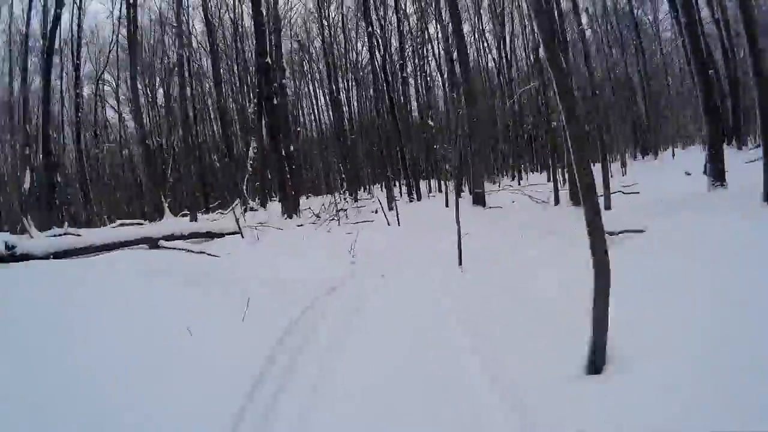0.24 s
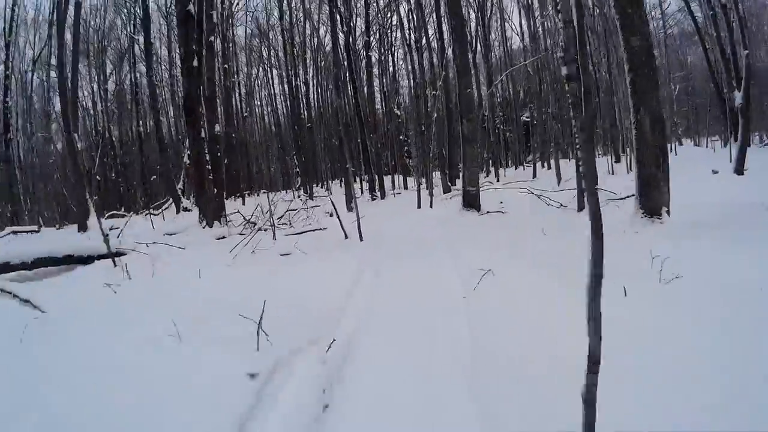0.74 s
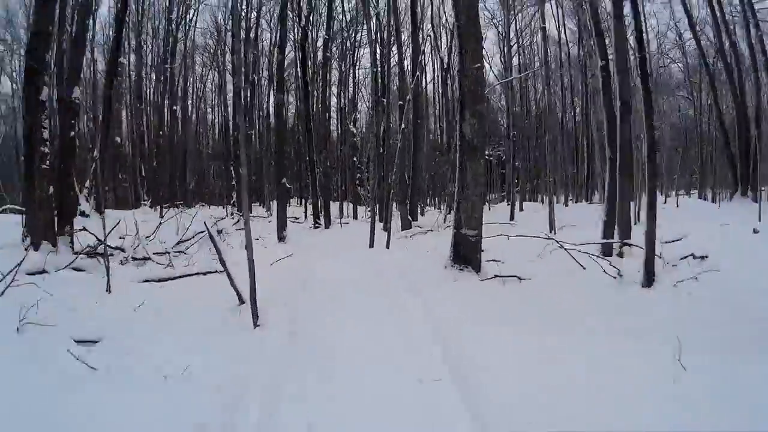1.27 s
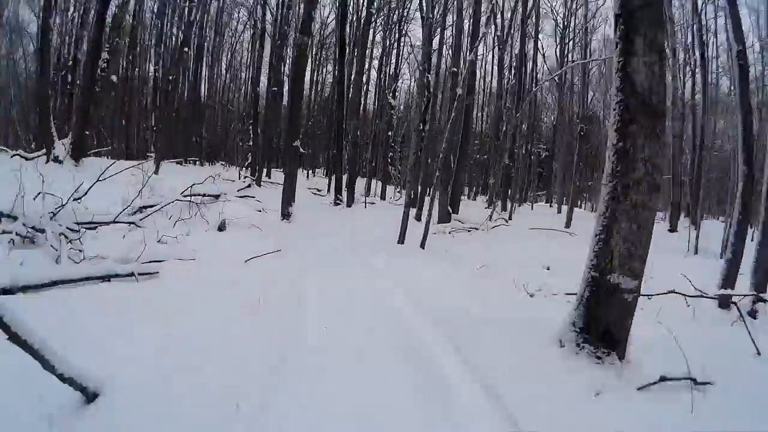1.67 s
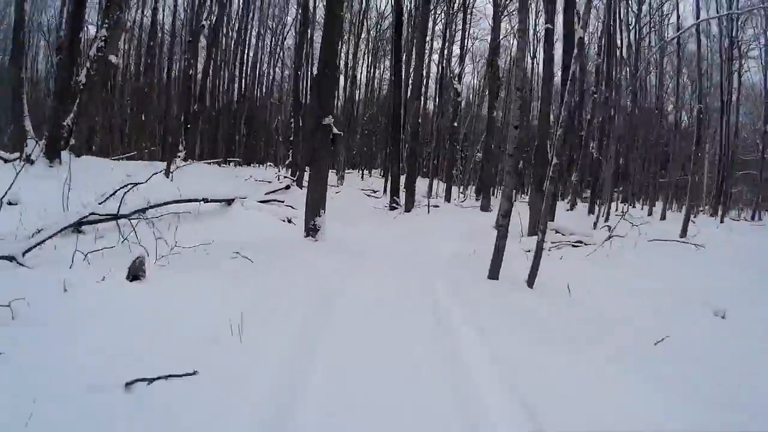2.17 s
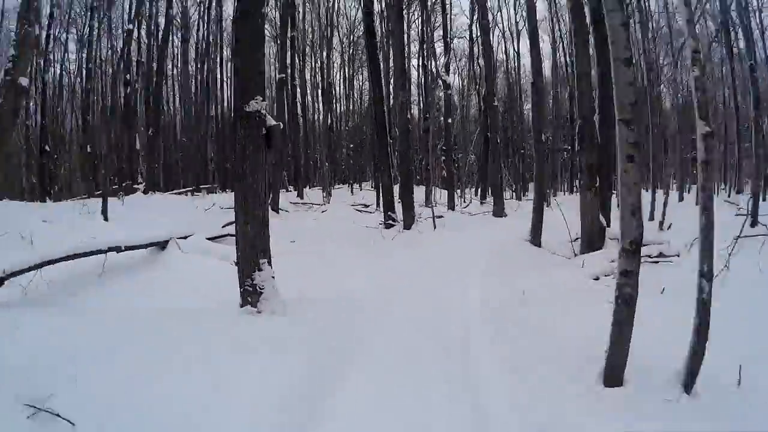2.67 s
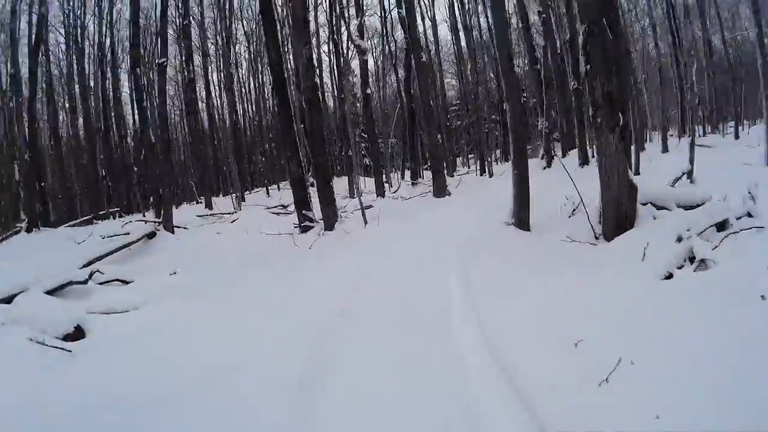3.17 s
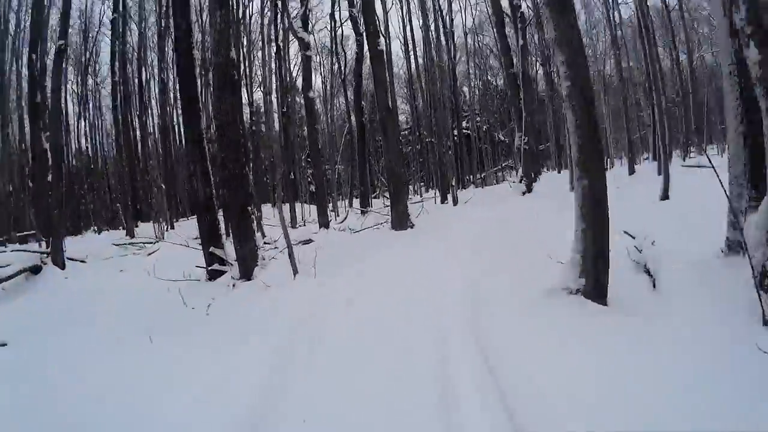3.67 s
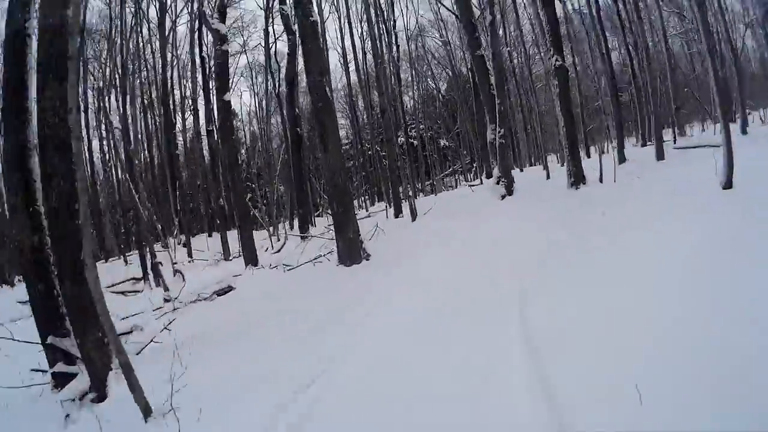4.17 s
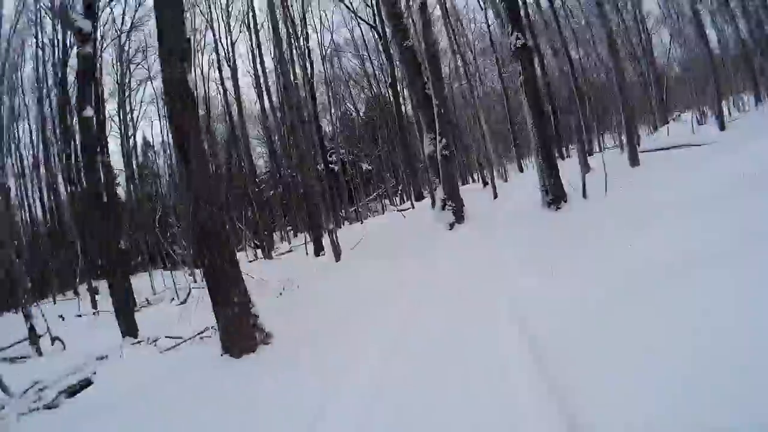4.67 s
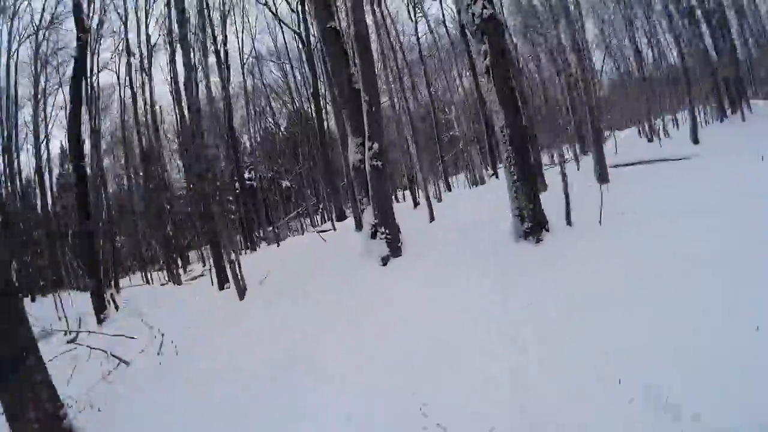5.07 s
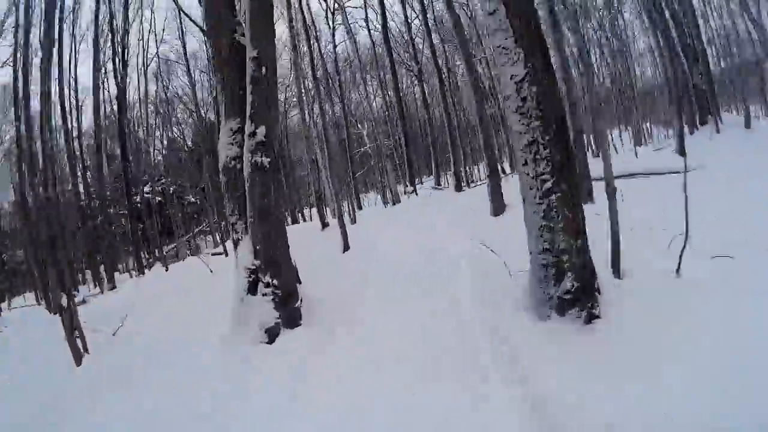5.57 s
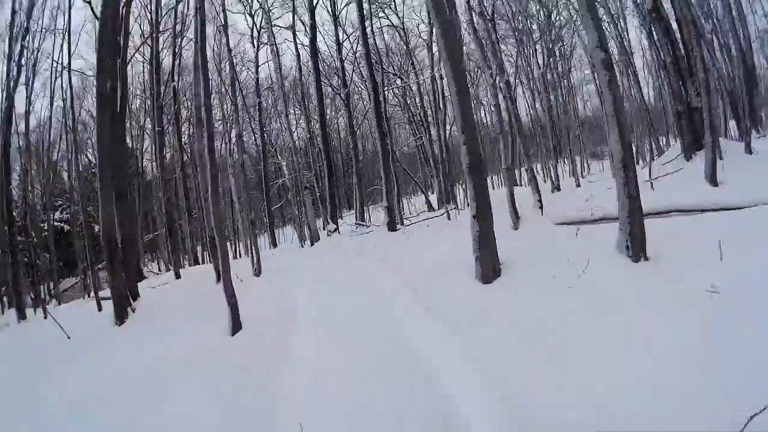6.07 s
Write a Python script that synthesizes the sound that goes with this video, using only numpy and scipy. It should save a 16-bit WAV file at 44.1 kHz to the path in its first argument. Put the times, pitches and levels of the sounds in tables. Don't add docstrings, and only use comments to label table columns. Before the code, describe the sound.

Very close, boxy frame-mounted sound of a bike on snow: constant deep rumble with uneven bumps and faint hiss. Loose plastic ticks in runs during the first two seconds. A rough half-second brake judder bursts out, far louder than the rolling, then drops to quiet pad taps. From about four and a half seconds a bright snap leads into scattered cracking knocks, soft chain slaps and light metallic rattles until the end.

```python
import sys
import numpy as np
from scipy import signal
from scipy.io import wavfile
from scipy.ndimage import uniform_filter1d

SR = 44100
rng = np.random.default_rng(int(sys.argv[2]) if len(sys.argv) > 2 else 0)


def file_out(sig):
    cols = np.atleast_2d(sig).T
    lim = np.clip(cols, -1, 1)
    pcm = np.round(lim * 32767).astype(np.int16)
    wavfile.write(sys.argv[1], SR, pcm)


def field_ratio(decibels):
    return 10 ** (np.asarray(decibels, dtype=float) / 20)


N = 278712
BITE_S, LET_GO_S, FREE_S = 1.829, 2.372, 4.47

# [t/s, level/dB]
PAD_GRABS = [(1.8297, -19), (1.836, -15), (1.8399, -12), (1.8566, -13), (1.8694, -15), (1.8765, -13),
             (1.8853, -11), (1.9034, -8.5), (1.917, -14), (1.9324, -13), (1.939, -7), (1.964, -11),
             (1.9686, -12), (1.9939, -7.5), (2.0005, -13), (2.01, -13), (2.03, -20), (2.046, -14.5),
             (2.064, -11), (2.077, -14), (2.0943, -11.5), (2.1043, -14), (2.123, -16), (2.1362, -15),
             (2.143, -19), (2.159, -22), (2.175, -18), (2.195, -14), (2.2204, -17), (2.2348, -17.5),
             (2.2534, -20.5), (2.2764, -19), (2.294, -14.5), (2.3084, -28), (2.3247, -18.5), (2.3454, -25),
             (2.3654, -28)]
# [t/s, housing ring level/dB, crack level/dB]
PAD_TAPS = [(2.690, -25.5, -58), (2.7561, -26, -54), (2.8051, -28, -66), (2.838, -30, -64),
            (2.853, -26.5, -42.5), (2.885, -23.5, -72), (2.9142, -26, -70), (2.9527, -27, -70),
            (2.974, -22.5, -63), (2.9833, -36, -58), (3.0107, -25.5, -57), (3.0458, -25.5, -59),
            (3.084, -30.5, -63), (3.1551, -22, -50), (3.191, -18.5, -41.6), (3.21, -25, -62),
            (3.2286, -19, -41.5), (3.243, -27, -61), (3.2654, -30, -62), (3.6871, -38, -40.5),
            (3.716, -29.5, -48), (3.742, -45, -42), (3.934, -24.5, -68), (3.9854, -33, -55.1),
            (4.064, -27.5, -67.1), (4.1509, -31, -62), (4.17, -29, -55), (4.1964, -34, -49),
            (4.222, -31, -52), (4.2516, -27.5, -48), (4.2835, -28.5, -57), (4.3857, -48, -38.5),
            (4.4485, -34, -47)]
# [t/s, level/dB]
CHAIN_SLAPS = [(4.647, -26.5), (4.716, -27), (4.817, -26.5), (4.851, -35), (4.884, -30.5), (4.916, -32),
               (5.055, -33), (5.0795, -26.5), (5.289, -31), (5.325, -30), (5.481, -27), (5.568, -26.5),
               (5.6, -26), (5.627, -25), (5.7438, -28), (5.8257, -26), (6.0317, -33), (6.087, -27),
               (6.1145, -35), (6.2326, -22.5), (6.264, -23)]
# [t/s, level/dB]
CABLE_SNAPS = [
    (4.535, -41),
    (4.540, -11),
    (4.551, -25),
    (5.68, -42),
]
# [f/Hz, width/Hz, level/dB]
HOUSING_MODES = [(1150, 63, 3.5), (1274, 74, 1), (1500, 218, 3.5), (1763, 99, -0.5), (1962, 120, -5),
                 (2050, 130, -28)]
# [f/Hz, level/dB, t60/s]
CRACK_MODES = [(2155, -0.5, 0.05), (2950, -7, 0.03), (3600, -11, 0.018), (4350, 3, 0.022),
               (5180, -11.5, 0.045), (5830, -26, .03)]


def rms_one(x):
    return x / np.sqrt(np.mean(x ** 2) + 1e-20)


def in_time(rows):
    s, *columns = np.transpose(rows)
    return [np.interp(np.arange(N) / SR, s, c) for c in columns]


def drift(rate):
    r = np.exp(-80 * np.pi * rate / SR)
    noise = rng.standard_normal(N // 40 + 2002)
    slow = signal.lfilter([1], [1, -2 * r, r * r], noise)[2000:]
    return np.interp(np.arange(N) / 40, np.arange(len(slow)), rms_one(slow))


def resonance(x, hz, width):
    r = np.exp(-np.pi * width / SR)
    poles = [1, -2 * r * np.cos(2 * np.pi * hz / SR), r * r]
    return signal.lfilter([(1 - r * r) / 2, 0, (r * r - 1) / 2], poles, x)


def cut(x, hz, kind, order):
    return signal.sosfilt(signal.butter(order, hz, kind, fs=SR, output="sos"), x)


def swells(rows, rest_db, ease_s):
    level = np.full(N, field_ratio(rest_db))
    for at, length, db in rows:
        level[int(at * SR):int((at + length) * SR)] = field_ratio(db)
    r = np.exp(-1 / (ease_s * SR))
    return 20 * np.log10(signal.filtfilt([1 - r], [1, -r], level) + 1e-9)


def fading(times, levels_db, t60):
    marks = np.full(N, 1e-18)
    marks[np.round(np.asarray(times) * SR).astype(int)] = field_ratio(np.asarray(levels_db))
    return signal.lfilter([1], [1, -field_ratio(-60 / (t60 * SR))], marks)


def bursts(times, levels_db, t60):
    signs = 1 - 2 * rng.integers(2, size=N, dtype=np.int8)
    return fading(times, levels_db, t60) * signs


def impulses(times, levels_db):
    blows = np.full(N, 1e-18)
    blows[(times * SR).astype(int)] = field_ratio(levels_db) * rng.choice([-1, 1], len(times))
    return blows


def shaken(modes, force, patchy_db, rate):
    out, plain = 0, 0
    for hz, width, db in modes:
        gain = np.repeat(field_ratio(db + patchy_db * drift(rate)[::8]), 8)[:N]
        once = resonance(force * rng.standard_normal(N), hz, 1.506 * width)
        out = out + gain * resonance(once, hz, 1.34 * width)
        plain = plain + field_ratio(2 * db) * width
    return out / np.sqrt(plain * 2.4 / SR)


def rolling(tyre_db, rub_db):
    # [start t/s, length/s, level/dB]
    bumps = [(0, 0.19, -20), (.22, 0.053, -19), (.34, 0.18, -18), (.5, 0.13, -22.5), (.83, 0.068, -19),
             (.95, 0.041, -25), (1.09, 0.11, -23.5), (1.235, 0.23, -21.5), (1.51, 0.02, -20),
             (1.685, 0.08, -20), (1.8, 0.091, -20), (1.92, 0.23, -14.5), (2.15, 0.096, -18.5),
             (2.3, 0.083, -23), (2.48, 0.14, -22), (2.72, 0.14, -26.5), (2.97, 0.058, -19.5),
             (3.13, 0.12, -25), (3.235, 0.075, -24), (3.53, 0.12, -22), (3.825, 0.037, -21.5),
             (3.9, 0.077, -22), (4.065, 0.054, -25.5), (4.16, 0.168, -27), (4.36, 0.11, -22.5),
             (4.68, 0.04, -21.5), (4.875, 0.092, -24.5), (5.005, 0.24, -24.5), (5.3, 0.087, -26.5),
             (5.45, 0.08, -25), (5.61, 0.13, -23), (5.78, .04, -21.5), (5.838, 0.069, -21),
             (5.93, 0.099, -24.5), (6.22, 0.054, -22)]
    swing_db = swells(bumps, rest_db=-29.5, ease_s=0.0034)
    grab = slips(depth_db=11.0, spread=0.33)
    judder = field_ratio(1.99 * drift(60))
    roll_db = np.minimum(rub_db, -46.5)
    brake = np.sqrt(field_ratio(rub_db) ** 2 - field_ratio(roll_db) ** 2 + 1e-12)
    roll = shaken(HOUSING_MODES, field_ratio(roll_db - 1.1) * judder ** 1.59, patchy_db=2.0, rate=4.0)
    rubbing = brake_drag(brake, grab) + pads_and_loose_parts(field_ratio(pad_hiss(rub_db)) * judder, grab)
    return tyres(tyre_db, swing_db) + roll + rubbing + hum(swing_db, even=0.76) + heave()


def tyres(tyre_db, swing_db):
    # [f/Hz, width/Hz, level/dB]
    frame_modes = [(155.2, 67, -7), (205, 39.4, 0), (247.7, 37.6, -6), (412, 10, -38), (465.3, 53.3, -1),
                   (660, 100, -19), (764.5, 64, -16), (842, 68, -19.5)]
    # [start t/s, length/s, lift/dB]
    crusts = [
        (.68, 0.091, 6.5),
        (1.19, 0.097, 4),
        (6.15, 0.091, 4.5),
    ]
    crunch_db = swells(crusts, rest_db=-0.4, ease_s=0.0071)
    force = field_ratio(tyre_db + crunch_db + 0.1 * (swing_db + 24.5))
    return shaken(frame_modes, force, patchy_db=-0.73, rate=84)


def hum(level_db, even):
    # [f/Hz, width/Hz, level/dB]
    mount_mode = (126.5, 10.55, 0)
    hz, width, db = mount_mode
    once = resonance(rng.standard_normal(N), hz, width)
    sway = rms_one(resonance(once, hz, 2.3 * width))[::-1]
    swell = np.sqrt(uniform_filter1d(sway ** 2, size=800) + 0.08)
    return field_ratio(level_db + db) * rms_one(sway / swell ** np.clip(even, 0, 1))


def heave():
    # [start t/s, length/s, level/dB]
    hollows = [
        (0, 0.49, -37),
        (.88, .15, -38),
        (3.18, 0.1, -44.5),
        (3.65, 0.25, -33),
        (4.17, 0.14, -37),
        (4.55, 0.91, -38),
        (5.3, 0.88, -36.5),
    ]
    low = cut(cut(rng.standard_normal(N), 69, "high", order=2), 105, "low", order=4)
    return field_ratio(swells(hollows, rest_db=-44, ease_s=0.032) + 3.5) * rms_one(low)


def slips(depth_db, spread):
    slips_per_s = 68
    at = np.cumsum(np.exp(spread * rng.standard_normal(700)) / slips_per_s)
    t = np.arange(N) / SR
    last = np.searchsorted(at, t)
    age = (t - np.append(0, at)[last]) * slips_per_s
    return rms_one(field_ratio(2.5 * rng.standard_normal(701)[last] - depth_db * age))


def brake_drag(brake, grab):
    # [f/Hz, width/Hz, level/dB]
    drag_modes = [(297, 47, -12), (452, 70, -1.5), (673.5, 30, -5), (741, 110, -7.5), (924, 94, -12.5),
                  (1166, 62, -6.5), (1308, 212, -9), (1482, 75, -1.5), (1668, 130, -15.5), (1830, 56, -11)]
    t = np.arange(N) / SR
    grab_s, grab_db = np.transpose(PAD_GRABS)
    onset = np.clip((t - BITE_S) / 0.0033, .12, 1)
    between_grabs = np.where((t > BITE_S) & (t < LET_GO_S), field_ratio(-5.5), 1)
    force = brake * onset * field_ratio(6.5) * grab ** .55 * between_grabs
    force = force + fading(grab_s, grab_db - 8.5, t60=0.042)
    return cut(shaken(drag_modes, force, patchy_db=-0.9, rate=32), 2300, "low", order=4)


def pad_hiss(rub_db):
    t = np.arange(N) / SR
    rubbing = -65.5 + 0.4 * (rub_db + 41)
    free = -71 + 0.46 * np.minimum(rub_db + 47.5, 3.0)
    clear = np.where(t > LET_GO_S, np.clip(1 - (t - LET_GO_S) / .13, 0, 1), 0)
    return np.where((t > BITE_S) & (t < FREE_S), rubbing - 13 * clear, free)


def pads_and_loose_parts(hiss, grab):
    # [f/Hz, width/Hz, level/dB]
    pad_modes = [(2880, 220, -3), (3620, 200, -2), (4000, 170, 0), (4500, 220, 0), (4910, 120, -6),
                 (5250, 150, -3), (5880, 200, -3), (8500, 900, -18), (11300, 300, -17)]
    # [f/Hz, width/Hz, level/dB]
    loose_modes = [(2780, 810, -5), (3560, 340, -4), (4400, 310, -0.5), (5350, 340, -5.5)]
    t = np.arange(N) / SR
    touching = np.clip((t > BITE_S) * (FREE_S - t) / .12, .15, 1)
    grab_s, grab_db = np.transpose(PAD_GRABS)
    tap_s, _, tap_db = np.transpose(PAD_TAPS)
    slap_s, slap_db = np.transpose(CHAIN_SLAPS)
    pad_force = touching * hiss * grab ** 0.18
    pad_force = pad_force + fading(grab_s, grab_db - 39, 0.033) + fading(tap_s, tap_db - 11.5, 0.042)
    loose_force = (1.1 - touching) * hiss + fading(slap_s, slap_db - 34.5, 0.034)
    pads = shaken(pad_modes, pad_force, patchy_db=2.5, rate=9)
    return pads + shaken(loose_modes, loose_force, patchy_db=2.5, rate=26)


def buzz():
    # [t/s, level/dB]
    early = [(0.0195, -25), (0.0279, -29), (0.0347, -36), (0.0383, -41), (0.0411, -44), (0.0461, -17.5),
             (0.0487, -30), (0.0558, -23.5), (0.0639, -21.5), (0.0699, -42), (0.0838, -42), (0.0929, -34),
             (0.0976, -41), (0.102, -35), (0.1096, -31), (0.133, -42), (0.1708, -43), (0.1761, -36),
             (0.1795, -28.5), (0.1848, -37), (0.1928, -40), (0.2106, -41), (0.2197, -36), (0.2288, -31),
             (0.2334, -42), (0.2373, -25.5), (0.2425, -33), (0.2479, -21), (0.2507, -36), (0.2661, -31),
             (0.2775, -36), (0.3127, -36), (0.3206, -28), (0.3297, -30), (0.3344, -41), (0.341, -38),
             (0.349, -25.5), (0.3521, -43), (0.3572, -28), (0.3662, -29.5), (0.3795, -33), (0.426, -38),
             (0.431, -46), (0.4366, -31), (0.4416, -36), (0.4576, -26.5), (0.4661, -26), (0.4739, -29),
             (0.4821, -30), (0.505, -44)]
    middle = [(0.5866, -35), (0.5936, -22.5), (0.599, -45), (0.624, -26.5), (0.7894, -40), (0.7938, -24),
              (0.8047, -26.5), (0.85, -43), (0.8727, -34), (0.8802, -31.5), (0.8885, -23.5), (0.9054, -39),
              (1.2462, -42), (1.249, -41.5), (1.3441, -18.5), (1.35, -23.5), (1.3541, -28), (1.358, -27),
              (1.3614, -20), (1.3663, -21), (1.37, -26), (1.3755, -36), (1.3788, -44), (1.405, -43),
              (1.411, -35), (1.4173, -25.5), (1.4735, -19), (1.482, -32), (1.4901, -21), (1.4953, -17.5),
              (1.501, -16), (1.51, -24), (1.5167, -40), (1.5237, -20.5), (1.5295, -22), (1.532, -26),
              (1.538, -36), (1.602, -42), (1.631, -39), (1.6416, -35), (1.6487, -33.5), (1.716, -51),
              (1.721, -29), (1.7308, -34), (1.746, -29), (1.749, -26), (1.756, -24), (1.7596, -23),
              (1.7673, -21.5)]
    braking = [(1.841, -36), (1.8506, -18), (1.8554, -26), (1.86, -21), (1.8674, -28), (1.87, -34),
               (1.8736, -20), (1.877, -26), (1.8815, -17.5), (1.8855, -26), (1.89, -16), (1.8961, -20),
               (1.9008, -27), (1.9067, -37), (1.9111, -36), (1.9142, -29), (1.923, -37), (1.9274, -28),
               (1.932, -31), (1.9363, -35), (1.944, -34), (1.975, -26), (1.981, -25), (1.9851, -32),
               (1.989, -27), (1.9919, -31), (1.9979, -26), (2.0057, -24), (2.0128, -32), (2.0176, -29),
               (2.0205, -23), (2.0295, -23), (2.0342, -27), (2.037, -18.5), (2.044, -26), (2.0543, -35),
               (2.0674, -34), (2.0707, -22), (2.0753, -19), (2.0792, -23), (2.0818, -35), (2.0848, -15.5),
               (2.0923, -16), (2.1008, -20), (2.1107, -32)]
    # [t/s, level/dB]
    thin = [(2.1291, -48), (2.1612, -46), (2.1747, -51), (2.1824, -47), (2.1974, -49), (2.2278, -54),
            (2.2434, -57), (2.2904, -57), (2.3072, -50), (2.317, -53), (2.4433, -56), (2.5197, -47),
            (2.527, -44), (2.5363, -42), (2.544, -43), (2.5584, -50)]
    # [f/Hz, width/Hz, level/dB]
    fitting_modes = [(1930, 490, -4.5), (2950, 120, -3), (3870, 670, 0), (6110, 1200, -3),
                     (8140, 740, -7.5), (8640, 1270, -11), (10800, 3500, -20.5), (14600, 5100, -30.5)]
    full = fitting(early + middle + braking + thin[-5:-1], fitting_modes, boost_db=12)
    return full + fitting(thin, fitting_modes[5:7], boost_db=24.5)


def fitting(rows, modes, boost_db):
    s, db = np.transpose(rows)
    db = db + boost_db
    contact = fading(s, db + 4.0, 0.000076)
    contact = contact + bursts(s, db - 5.5, 0.0056) + bursts(s + 0.002, db - 29.5, 0.011)
    out = 0
    for k, (hz, width, level_db) in enumerate(modes):
        out = out + field_ratio(level_db) * resonance(contact, hz, width) * (-1) ** k
    return out


def crack(modes, times, levels_db):
    out = 0
    for hz, db, t60 in modes:
        blow = bursts(times, levels_db + db, t60) + fading(times, levels_db + db + 6, 0.00012)
        out = out + resonance(resonance(blow, hz, 0.1 * hz), hz, 0.31 * hz)
    return out


def knocks():
    # [t/s, ring level/dB, ring f/Hz, crack level/dB, thud level/dB]
    blows = [(0.0064, -9, 1615, -25, -23.5), (1.7121, -30, 1280, -33, -23.5),
             (1.755, -16.5, 1500, -32, -22.5), (2.573, -19.5, 1386, -39, -35),
             (4.540, -20.5, 1633, -36.5, -21), (4.5501, -22.5, 1540, -49, -33),
             (4.778, -16, 1567, -22.5, -26.5), (5.131, -15, 1660, -24, -34), (5.187, -10.5, 1667, -20, -24),
             (5.2102, -18.5, 1696, -23.5, -29.5), (5.5205, -13, 1697, -21, -28),
             (5.692, -15, 1600, -19.5, -22.5), (5.7994, -17, 1643, -20.5, -30),
             (5.854, -26, 1290, -58, -28.5), (5.8761, -17.5, 1670, -22, -25),
             (5.972, -25.5, 1660, -29.5, -42), (6.173, -19, 1710, -22, -32.5),
             (6.297, -21, 1645, -23.5, -35.5)]
    blow_tops_db = [5.5, -7, 11, -4, -3, -6, -6, 5.5, 4, -2, 3.5, -1, -2.5, 0.1, -0.5, 4, -1.5, -2]
    # [f/Hz, level/dB, t60/s]
    top_modes = [(6500, -23, 0.018), (8100, 6, 0.012), (8560, 8.5, 0.023), (11350, 3, 0.019),
                 (15450, 1.5, .012)]
    s, ring_db, ring_hz, crack_db, thud_db = np.transpose(blows)
    out, age = np.zeros(N), np.arange(2600) / SR
    phases = rng.uniform(0, 2 * np.pi, (len(s), 2))
    for at, db, hz, (p, q) in zip(s, ring_db, ring_hz, phases):
        lower = 0.29 * np.sin(2 * np.pi * .9 * hz * age + q) * field_ratio(1170 * age)
        pair = np.sin(2 * np.pi * hz * age + p) + lower
        ring = field_ratio(db + 5.5 - 60 * age / 0.027) * (1 - np.exp(-age / .0011)) * pair
        i = int(at * SR)
        out[i:i + len(age)] += ring[:N - i]
    snap_s, snap_db = np.transpose(CABLE_SNAPS)
    top_s = np.append(s - .0006, snap_s)
    top_db = np.append(crack_db - 18 + blow_tops_db, snap_db - 29.5)
    bright = crack(CRACK_MODES, s - .0005, crack_db + 6.0) + crack(top_modes, top_s, top_db)
    thud = bursts(s, thud_db + 24.0, 0.06)
    low_thud = resonance(resonance(thud, 484, 130), 434, 250)
    return out + bright + low_thud + 0.54 * resonance(resonance(thud, 670, 380), 515, 440)


def taps():
    # [f/Hz, level/dB, t60/s]
    snap_modes = [(2670, -13, 0.052), (3100, 2, 0.014), (3520, 9, 0.007), (3880, 0, 0.014)]
    s, ring_db, crack_db = np.transpose(PAD_TAPS)
    clicks = impulses(s, ring_db + 45.5)
    grab_s, grab_db = np.transpose(PAD_GRABS)
    grabs = impulses(grab_s, grab_db + 40.5)
    ring = cut(resonance(resonance(clicks, 1495, 70), 1500, 260), 1900, "low", order=4)
    ring = ring + cut(resonance(resonance(grabs, 1458, 81), 1440, 480), 2270, "low", order=4)
    slap_s, slap_db = np.transpose(CHAIN_SLAPS)
    slap = bursts(slap_s, slap_db + 11.5, 0.04)
    puff = sum(field_ratio(db) * resonance(slap, hz, 1.02 * width) for hz, width, db in HOUSING_MODES)
    puff = cut(cut(puff, 1200, "high", order=2), 1580, "low", order=4)
    snap_s, snap_db = np.transpose(CABLE_SNAPS)
    return ring + puff + crack(CRACK_MODES, s, crack_db + 1) + crack(snap_modes, snap_s, snap_db)


def jolts():
    # [t/s, level/dB, f/Hz]
    ruts = [(0.244, -36, 190), (0.338, -16, 205), (0.648, -21, 191), (0.836, -18.5, 186), (0.965, -24, 228),
            (1.017, -24, 200), (1.082, -18.5, 211), (1.184, -27, 216), (1.296, -33, 192),
            (1.607, -17.5, 180), (1.756, -18.5, 196), (1.816, -13.5, 187), (1.936, -17, 177),
            (2.032, -19.5, 201), (2.132, -18, 207), (2.264, -22, 201.5), (2.326, -25.5, 193),
            (2.609, -28, 205), (2.727, -34.5, 238), (2.959, -29, 192), (3.065, -26, 181),
            (3.203, -18.5, 215), (3.473, -34, 204), (3.548, -20.5, 184), (3.671, -37, 249),
            (3.765, -28, 211), (3.82, -24, 196), (3.999, -26, 205.6), (4.193, -22, 200),
            (4.572, -17.5, 207.6), (4.679, -29, 226), (4.871, -21.5, 231), (5.189, -32, 199),
            (5.315, -22.5, 215), (5.49, -21.5, 219.5), (5.589, -18.5, 194.3), (5.681, -24, 192),
            (5.761, -27, 205), (5.824, -20, 231.5), (5.925, -18, 206.8), (6.009, -26, 196),
            (6.084, -20, 205), (6.165, -21.5, 232)]
    out, age = np.zeros(N + SR), np.arange(9000) / SR
    rise = (1 - np.exp(-age / 0.004)) ** 2
    for (at, db, hz), phase in zip(ruts, rng.uniform(0, 2 * np.pi, len(ruts))):
        swing = rise * np.sin(2 * np.pi * hz * age + phase)
        out[int(at * SR):][:len(age)] += field_ratio(db - 60 * age / 0.33) * swing
    return out[:N]


def squeal():
    # [t/s, level/dB]
    whistle = [
        (1.85, -90),
        (1.865, -64),
        (1.9, -70),
        (2.02, -65),
        (2.04, -78),
        (2.2, -68),
        (2.33, -74),
        (2.36, -94),
    ]
    # [t/s, low tone level/dB, high tone level/dB]
    release = [
        (2.35, -60, -60),
        (2.38, -33, -36),
        (2.46, -34, -38),
        (2.52, -32, -36),
        (2.58, -33, -40),
        (2.61, -60, -60),
    ]
    # [t/s, f/Hz, level/dB, length/s]
    chirps = [(1.875, 11100, -57, .015), (1.964, 11200, -48, .012), (2.0, 11150, -45, .014),
              (2.122, 11000, -53, .012), (2.167, 7700, -56, .012), (2.786, 11600, -68, .012),
              (3.165, 11900, -68, .012), (3.845, 5900, -64, .008), (3.927, 8500, -69, .008),
              (3.97, 8200, -67, .006), (3.99, 5900, -63, .013), (4.03, 6200, -68, .013),
              (4.07, 6200, -63, .013), (4.113, 6200, -65, .013), (4.194, 6200, -60, .013),
              (4.22, 11800, -70, .012), (4.235, 6200, -68, .011), (4.31, 11900, -67, .008),
              (4.41, 5850, -63, .012)]
    t = np.arange(N) / SR
    let_go = (t > release[0][0]) & (t < release[-1][0])
    low_db, high_db = in_time(release)
    song = tone(322, low_db - 2.5, wobble_hz=9, flutter_db=2.5, rate=12)
    song = song + tone(1535, high_db, wobble_hz=12, flutter_db=2.5, rate=15)
    out = tone(11020, in_time(whistle)[0], wobble_hz=124, flutter_db=4.5, rate=37) + let_go * song
    for at, hz, db, length in chirps:
        near = slice(int((at - .05) * SR), int((at + .05) * SR))
        bell = np.exp(-(2.2 * (t[near] - at) / length) ** 2)
        out[near] += field_ratio(db) * bell * np.sin(2 * np.pi * hz * t[near])
    return out


def tone(hz, db, wobble_hz, flutter_db, rate):
    level = field_ratio(db + flutter_db * drift(rate))
    return level * np.sin(2 * np.pi * np.cumsum(hz + wobble_hz * drift(8.0 * rate)) / SR)


def jingles():
    # [t/s, level/dB, f/Hz]
    clumps = [(1.4416, -39, 3670), (4.4897, -56, 2860), (4.6074, -44, 2900), (4.646, -36, 4100),
              (5.079, -48, 2940), (5.1053, -42, 4270), (5.2899, -36, 3960), (5.3233, -44, 2900),
              (5.3288, -39, 4430), (5.3627, -45, 3630), (5.4789, -56, 2800), (5.6266, -52, 3490),
              (5.6584, -54, 2830), (5.7468, -54, 2910), (6.0212, -46, 3620), (6.115, -44, 2820),
              (6.2054, -44, 2930), (6.2672, -46, 3470)]
    width_hz = 410
    out, age = np.zeros(N + SR), np.arange(9000) / SR
    for (at, db, hz), puff in zip(clumps, rng.standard_normal((len(clumps), len(age)))):
        puff = puff * field_ratio(db + 1 - 60 * age / 0.045)
        out[int(at * SR):][:len(age)] += resonance(resonance(puff, hz, width_hz), hz, 2 * width_hz)
    return out[:N]


def air():
    return field_ratio(-70) * cut(rng.standard_normal(N), 2500, "high", order=2)


def scene():
    # [t/s, tyre rumble level/dB, rub on the housing level/dB]
    ride = [(0, -29, -48.5), (.38, -30.5, -49), (.55, -33, -52.5), (.8, -30.5, -48), (1.7, -29.5, -47),
            (1.78, -40, -27), (1.83, -15.5, -18), (1.96, -26.5, -21), (2.18, -19.5, -23.5),
            (2.368, -28, -30), (2.385, -29, -43.5), (3.2, -28, -41.5), (3.6, -27, -44),
            (4.24, -29.5, -38.5), (4.65, -28.5, -46.5), (5.72, -29.5, -45.5), (5.88, -28.5, -47),
            (6.32, -29, -43)]
    contacts = buzz() + knocks() + taps() + jolts()
    return (rolling(*in_time(ride)) + contacts + squeal() + jingles() + air())[None]


def band_limit(x):
    return signal.sosfilt(signal.butter(12, 16960, fs=SR, output="sos"), x)


def record(dry):
    rounded = 1.2 * np.tanh(dry / 1.2)
    top_cut = signal.sosfilt(signal.cheby2(10, 40, 16100, fs=SR, output="sos"), rounded)
    return band_limit(top_cut)


dry = scene()
out = record(dry)
file_out(out)
```